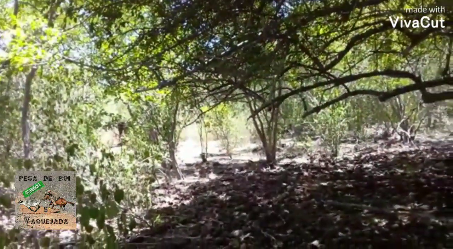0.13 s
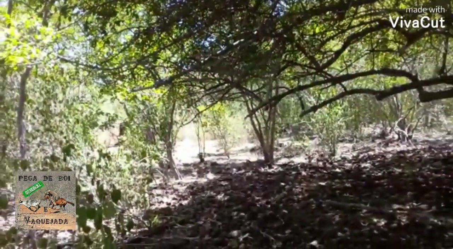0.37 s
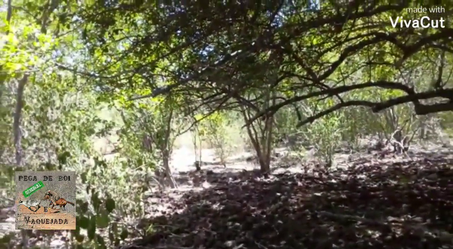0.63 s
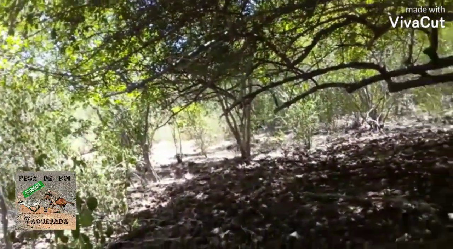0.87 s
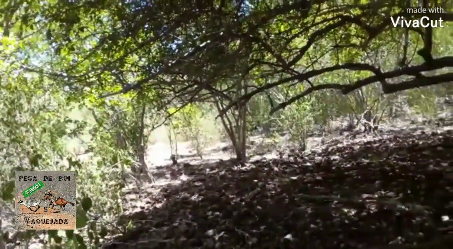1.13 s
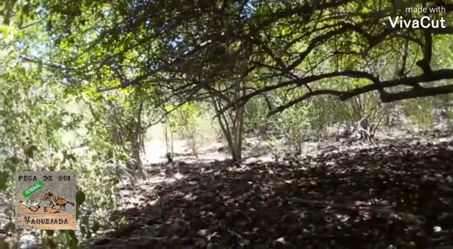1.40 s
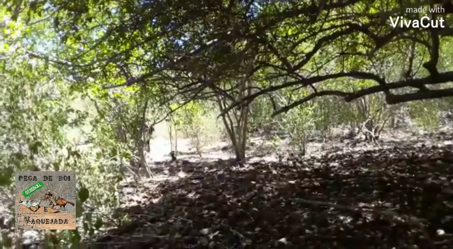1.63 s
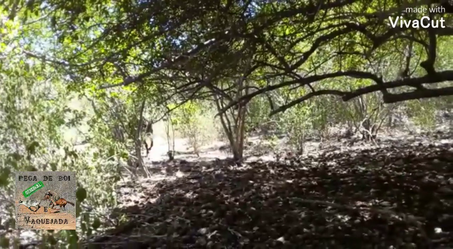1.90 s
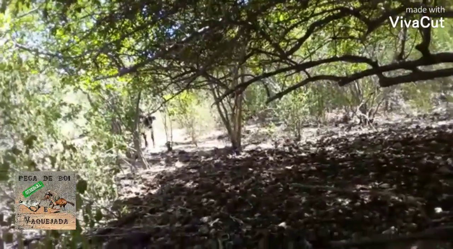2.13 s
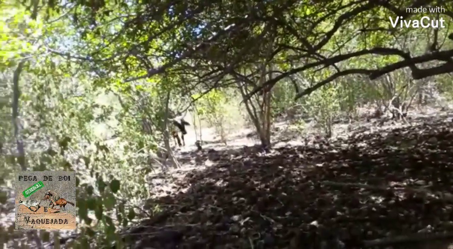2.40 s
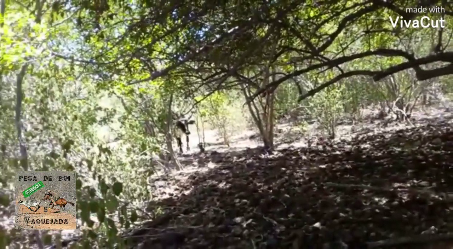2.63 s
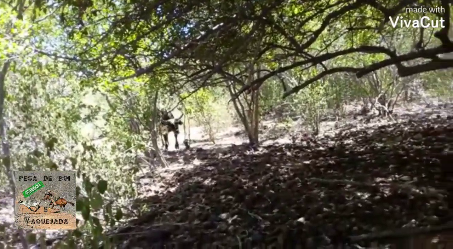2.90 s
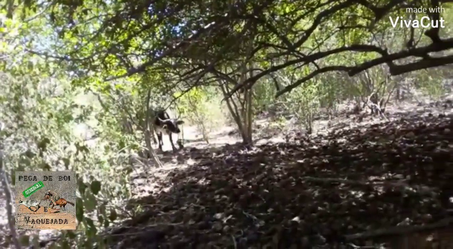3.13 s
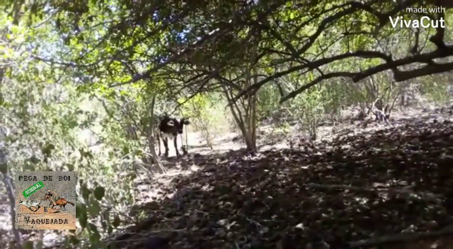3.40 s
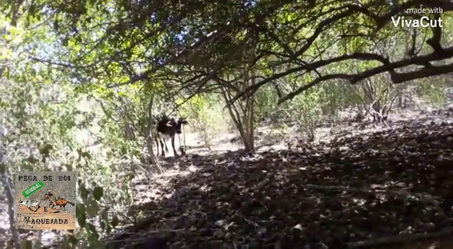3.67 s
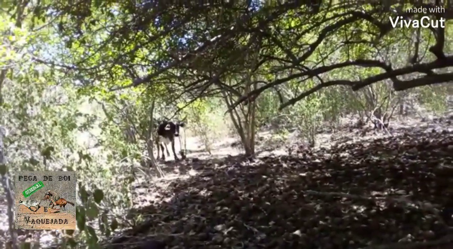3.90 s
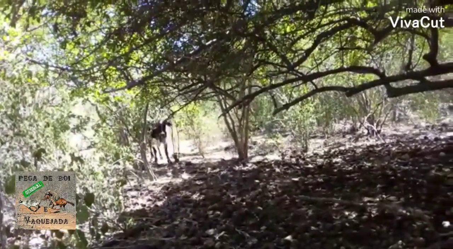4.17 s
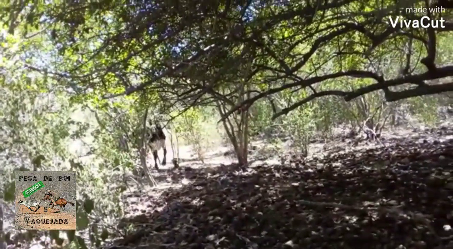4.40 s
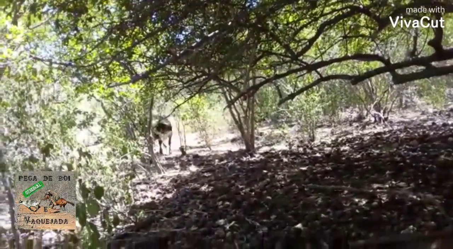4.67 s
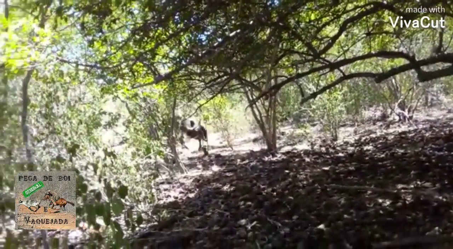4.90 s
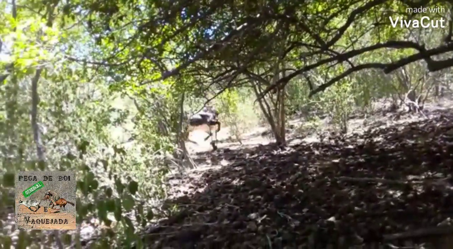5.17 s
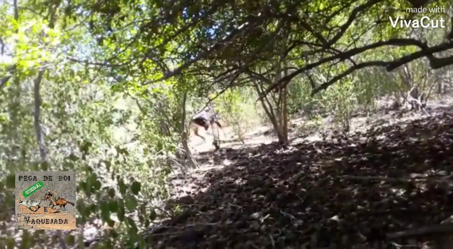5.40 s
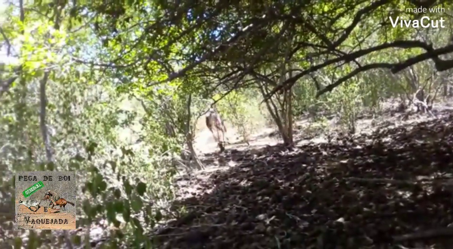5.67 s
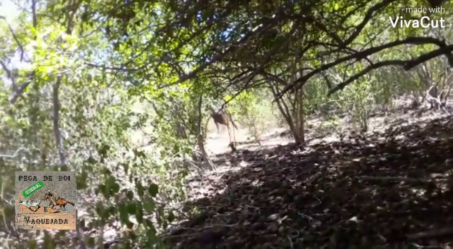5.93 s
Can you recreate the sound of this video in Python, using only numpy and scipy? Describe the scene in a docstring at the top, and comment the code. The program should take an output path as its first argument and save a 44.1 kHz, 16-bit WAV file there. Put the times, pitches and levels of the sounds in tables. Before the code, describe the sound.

Scattered brittle snaps over near silence, one faint bird whistle, then denser leaf crackle and soft hoof thuds peaking in a sudden crash through brush.

```python
"""Dry scrub, heard some way off through a phone: an animal moves, first sparsely, then in a dense rush.
Snapping twigs are brief cracks trailed by leaf bits; knocking sticks and thudding hooves are struck
resonances; leaf litter is dense tiny fractures, with scraping stems and ground rumble following it.
A small bird whistles once in gliding sines; distant air and wind rumble are steady filtered noise."""
import sys
import numpy as np
from scipy import signal
from scipy.fft import rfft, irfft
from scipy.io import wavfile
from scipy.ndimage import uniform_filter1d

SR = 44100
rng = np.random.default_rng(int(sys.argv[2]) if len(sys.argv) > 2 else 0)


def gain_from_db(level_db):
    """Convert decibel levels to linear amplitude factors (20 dB per decade)."""
    decades = np.asarray(level_db, float) / 20
    return 10 ** decades


def persist_wave(psi):
    """Save psi, clipped to +-1, as 16-bit WAV."""
    counts = np.round(np.clip(psi, -1, 1) * 32767).astype(np.int16)
    wavfile.write(sys.argv[1], SR, np.atleast_2d(counts).T)


N = 266496

# hooves and heavy branches: start_s, peak_db, pitch_hz, t60_s (sliding soil)
THUD_EVENTS = [(1.122, -57, 414, 0.1), (1.446, -54.5, 316, 0.22), (1.497, -50.5, 815, 0.13),
               (3.0, -54, 280, 0.12), (3.008, -48.5, 790, 0.18), (3.531, -50.5, 630, 0.15),
               (4.479, -49, 290, 0.33), (4.842, -45, 796, 0.57), (4.956, -33, 227, 0.091),
               (4.958, -37.5, 580, 0.033), (5.546, -44.5, 123, 0.1), (5.608, -49, 705, 0.12),
               (5.69, -42, 690, 0.26), (5.753, -43.5, 149, 0.12), (5.92, -42.5, 275, 0.072),
               (5.97, -42.5, 130, 0.39)]
# thicker sticks knocking and snapping: start_s, peak_db, pitch_hz, t60_s (slipping fibres)
KNOCK_EVENTS = [(0.1967,-52.5,1730,0.02),(0.772,-56,1560,0.042),(0.8134,-36.5,1820,.018),(0.8752,-52,1200,.022),(0.8915,-50,2090,0.028),(0.928,-50,2020,0.028),(0.943,-49.5,1690,.032),(.9747,-52,1630,0.073),(1.125,-53,1610,0.047),(1.274,-53,4410,.025),(1.4452,-39,1870,0.024),(1.5073,-37,1600,0.072),(1.5311,-43.5,1380,0.03),(1.7263,-50,2250,0.016),(1.8148,-43,2210,0.011),(2.0756,-38.5,1900,.027),(2.1234,-49,2290,0.022),(2.3273,-50.5,2350,.027),(2.416,-40,2310,0.011),(2.5286,-53,2540,.013),(2.556,-42.5,2600,0.01),(2.5732,-32.5,4080,0.01),(2.705,-53,2630,.019),(2.797,-48,2180,0.11),(3.0001,-46,1370,0.055),(3.016,-44.5,1500,0.036),(3.1182,-39.5,1670,0.013),(3.157,-43.5,2260,0.01),(3.3587,-51.5,2620,0.022),(3.532,-46,1700,0.1),(3.5603,-37,2620,0.021),(3.614,-40,3990,.025),(3.6457,-37.5,2200,0.011),(3.6983,-45,1720,.025),(3.7302,-42.5,2360,.033),(3.821,-46,2720,.022),(3.8712,-52,2390,.025),(3.8918,-41,2630,0.033),(3.922,-48.5,1690,.023),(3.9436,-34.5,2650,.009),(3.964,-37,2920,.02),(3.9701,-34.5,1810,0.026),(3.983,-48,2170,0.022),(4.0416,-33.5,3020,0.016),(4.0563,-37,2800,0.013),(4.135,-30.5,2900,0.018),(4.141,-56,2400,0.018),(4.4779,-41.5,1140,0.12),(4.592,-45,1080,0.13),(4.786,-48,3940,0.029),(4.8463,-34.5,3920,0.2),(4.959,-37,2130,0.053),(5.1904,-66,1920,.034),(5.2452,-47,1240,0.097),(5.2973,-47,2130,.039),(5.3792,-28,2080,0.028),(5.5333,-39,2260,0.044),(5.661,-25.5,4100,0.066),(5.6681,-38,2150,0.048),(5.6977,-25.5,1720,0.029),(5.884,-41.5,2100,0.034),(5.9294,-38.5,2150,0.036),(5.977,-40.5,2100,0.019)]
# spectrum of dry leaves: freq_hz, gain_db
LEAF_SPECTRUM = [(1500, -47), (2600, -10), (4500, -11.5), (5150, -3.5), (6000, -4.5), (6800, -3),
                 (8800, -6.5), (10200, -3), (11400, -8.5), (12600, -21), (16000, -61)]


def unit(x):
    """Scale to rms 1."""
    return x / np.sqrt(np.mean(x ** 2))


def peak(x, db):
    """Scale to a peak level."""
    return gain_from_db(db) * x / np.max(np.abs(x))


def decay(t, t60_s):
    """Exponential envelope, down 60 dB after t60_s."""
    return np.exp(-np.log(1000) * t / t60_s)


def colour(x, points):
    """Causal minimum-phase filter whose gain follows (Hz, dB) points."""
    hz, db = np.transpose(points)
    grid_hz = np.maximum(np.fft.rfftfreq(4096, 1 / SR), 1)
    gain = gain_from_db(np.interp(np.log(grid_hz), np.log(hz), db))
    cepstrum = irfft(np.log(gain))
    cepstrum[1:2048] *= 2  # fold onto positive time
    cepstrum[2049:] = 0
    impulse = irfft(np.exp(rfft(cepstrum)))
    return signal.fftconvolve(x, impulse)[:len(x)]


def ring(x, hz, width_hz):
    """Two-pole resonance, gain 1 at the centre."""
    b, a = signal.iirpeak(hz, max(hz / width_hz, 0.3), fs=SR)
    return signal.lfilter(b, a, x)


def walk(rate_hz):
    """Random levels held 1 / rate_hz, smoothed twice."""
    hold = int(SR / rate_hz)
    steps = np.repeat(rng.standard_normal(N // hold + 1), hold)
    return 0.14 * uniform_filter1d(uniform_filter1d(steps, hold), hold)[:N]


def grains(size, per_s, spread_db):
    """Tiny fractures at random moments, mostly small, a few large; rms 1."""
    hit = rng.random(size) < per_s / SR
    return unit(hit * rng.standard_normal(size) * gain_from_db(spread_db * rng.exponential(size=size)))


def add(out, start_s, sound):
    """Lay a sound into out at start_s."""
    i = int(start_s * SR)
    out[i:i + len(sound)] += sound[:N - i]


def along(column):
    """One column of the brush curve at every sample."""
    # body pushing through brush: start_s, leaf_db, stems_re_leaves_db, ground_rumble_db
    curve = np.array([(0.0, -77, -5.5, -70.5), (0.62, -74.5, -3, -68), (0.97, -68, -6, -67.5),
                      (1.13, -73, -3.5, -67.5), (1.36, -72, -2.5, -71), (1.65, -65.5, -3, -72.5),
                      (1.85, -69, -4.5, -70), (2.1, -76, -3.5, -69), (2.44, -72, -0.5, -67.5),
                      (2.86, -75, -0.5, -68), (3.13, -61.5, -5.5, -63.5), (3.48, -68.5, -7, -69.5),
                      (3.62, -59, -2.5, -63), (3.92, -63.5, -9.5, -71), (4.16, -71.5, -22, -68.5),
                      (4.44, -63, -5.5, -68.5), (4.63, -57, -10, -63.5), (4.83, -57.5, -1, -59),
                      (5.05, -58.5, -2, -56.5), (5.18, -51, -6.5, -57), (5.33, -41, -5.5, -53),
                      (5.43, -40.5, -5, -55), (5.77, -63, -4, -63), (6.04, -52, -12, -57.5)])
    return np.interp(np.arange(N) / SR, curve[:, 0], curve[:, column])


def scattered(per_s, above_leaves_db, low_hz, high_hz):
    """Small breaks at random moments, louder with the leaf rustle: rows start_s, peak_db, pitch_hz."""
    top_db, spread_db = -66, 3.5  # rustle above top_db brings no louder breaks
    when, size, pitch = rng.random((int(per_s * N / SR), 3)).T
    leaf_db = np.minimum(along(column=1)[(when * N).astype(int)], top_db)
    peak_db = leaf_db + above_leaves_db - spread_db * np.log(1 - size)
    pitch_hz = low_hz * (high_hz / low_hz) ** pitch
    return list(zip(when * N / SR, peak_db, pitch_hz))


def after(events, re_peak_db, t60_s):
    """Gain that jumps at each event to its peak plus re_peak_db and dies away."""
    kicks = np.zeros(N)
    for start_s, peak_db, *_ in events:
        kicks[int(start_s * SR)] += gain_from_db(peak_db + re_peak_db)
    return signal.lfilter([1], [1, -decay(1 / SR, t60_s)], kicks)


def distant_air():
    """Noise shaped to distant air and wind rumble, drifting slowly in level."""
    # freq_hz, gain_db (relative)
    spectrum = [(15, -55.5), (25, 5.5), (108, 8), (163, -12.5), (305, -4), (864, -15.5), (985, -16),
                (1750, -9), (2940, -38), (5640, -43), (10000, -29), (11400, -23), (12600, -44),
                (16400, -89), (22000, -120)]
    return unit(colour(rng.standard_normal(N), spectrum)) * gain_from_db(-71.5 + 0.58 * walk(2))


def ground_rumble():
    """Low noise from the ground that swells with the brush and rumbles on after each thud."""
    # freq_hz, gain_db (relative)
    spectrum = [(24, -56), (40, -3.5), (129, 3.5), (168, -2), (229, 0), (434, -8.5), (549, -7.5),
                (900, -15.5), (1170, -41.5), (1980, -120)]
    rumble = unit(colour(rng.standard_normal(N), spectrum))
    level = gain_from_db(along(column=3)) + after(THUD_EVENTS, re_peak_db=-8.5, t60_s=0.096)
    return rumble * level * gain_from_db(2.04 * walk(15))


def scraping_stems(flutter):
    """Dense fractures excite the stems' resonances and scrape on after each knock."""
    # centre_hz, width_hz, gain_db (relative)
    resonances = [(774, 550, 6.5), (1103, 270, 5), (1323, 254, 7.5), (2100, 335, 11.5), (2920, 250, 7.5),
                  (3710, 1000, 3)]
    scrape = grains(N, 5000, 2.3)
    stems = np.zeros(N)
    for hz, width_hz, db in resonances:
        stems += gain_from_db(db) * ring(ring(scrape, hz, width_hz), hz, 1.87 * width_hz)
    level = gain_from_db(along(column=1) + along(column=2)) + after(KNOCK_EVENTS, re_peak_db=-25.5, t60_s=0.16)
    return unit(stems) * level * gain_from_db(0.32 * flutter + 0.5 * walk(18))


def leaf_litter(flutter):
    """Leaves of several sizes crackle apart, each ringing in its own range, over a shared crackle."""
    sizes_hz = 3000 * 2 ** np.arange(0, 2.2, 0.34)
    apart = np.zeros(N)
    for hz in sizes_hz:
        apart += ring(grains(N, 2300, 3), hz, 0.4 * hz) * np.sqrt(hz) * gain_from_db(0.66 * walk(15))
    together = grains(N, 8000, 0.54)
    litter = unit(colour(unit(apart) + 3.3 * together, LEAF_SPECTRUM))
    return litter * gain_from_db(along(column=1) + 8.3 * flutter)


def brush():
    """Leaves and stems flutter together over the ground rumble."""
    flutter = walk(39)
    return leaf_litter(flutter) + scraping_stems(flutter) + ground_rumble()


def bird():
    """Thin whistled notes, pure sines gliding smoothly."""
    # one list per note: time_s, pitch_hz, level_db (rms)
    notes = [
        [(.267, 8340, -74), (.285, 8500, -67), (.315, 8330, -79), (.34, 7700, -66.5), (.395, 8230, -78),
         (.42, 7450, -71), (.46, 6860, -76), (.477, 6500, -72)],
        [(.395, 6000, -84), (.41, 6560, -79), (.428, 7400, -81)],
        [(.325, 6200, -82), (.338, 6800, -73), (.36, 6400, -83)],
        [(.232, 1600, -81), (.25, 2520, -64), (.258, 2400, -70), (.268, 1700, -77)],
    ]
    out = np.zeros(N)
    for note in notes:
        time_s, hz, db = np.transpose(note)
        t = np.arange(time_s[0], time_s[-1], 1 / SR)
        glide_hz = uniform_filter1d(np.interp(t, time_s, hz), size=400, mode="nearest")
        tone = np.sin(2 * np.pi * np.cumsum(glide_hz) / SR)
        level = np.sqrt(2) * gain_from_db(np.interp(t, time_s, db))
        add(out, time_s[0], level * tone * signal.windows.tukey(len(t), 0.08))
    return out


def hollow():
    """Brief sines wavering with narrow noise, quick to rise and slower to fade."""
    # start_s, level_db (sine peak before the envelope), pitch_hz, length_s
    tones = [(3.194, -61.5, 817, 0.089), (3.713, -65, 789, 0.1), (3.827, -62, 778, 0.049),
             (4.472, -54.5, 777, 0.094), (4.581, -59.5, 705, 0.12)]
    out = np.zeros(N)
    for start_s, db, hz, length_s in tones:
        t = np.arange(int(2 * length_s * SR)) / SR
        waver = 0.75 * unit(ring(rng.standard_normal(len(t)), hz, 200))
        shape = (1 - np.exp(-t / 0.015)) * np.exp(-(t / length_s) ** 3)
        add(out, start_s, gain_from_db(db) * shape * (np.sin(2 * np.pi * hz * t) + waver))
    return out


def thuds():
    """A blow and sliding soil ring the ground at one low pitch; a harder edge reaches higher."""
    out, t = np.zeros(N), np.arange(SR // 2) / SR
    for start_s, db, hz, t60_s in THUD_EVENTS:
        soil = rng.standard_normal(len(t)) * decay(t, t60_s)
        blow = 0.98 * np.exp(-((t - 0.004) * hz * 4) ** 2)
        edge = 0.23 * ring(soil * np.exp(-t / 0.0039), 3 * hz, 4 * hz)
        body = ring(ring(soil + blow, hz, 0.47 * hz), hz, 0.27 * hz)
        add(out, start_s, peak(body + edge, db))
    return out


def knocks():
    """An impulse and quick slips of breaking fibres ring the stick at its pitch."""
    out, t = np.zeros(N), np.arange(SR // 5) / SR
    small_t60_s = 0.0083
    breaks = scattered(per_s=2.5, above_leaves_db=4.5, low_hz=1300, high_hz=3300)
    small = [(*row, small_t60_s) for row in breaks]
    for start_s, db, hz, t60_s in KNOCK_EVENTS + small:
        slips = 0.1 * grains(len(t), 3700, 0.6) * decay(t, t60_s)
        slips[0] += 1
        add(out, start_s, peak(ring(ring(slips, hz, 0.31 * hz), hz, 3.8 * hz), db))
    return out


def snaps():
    """A millisecond crack with its own colour, then leaf bits and scattered echoes dying away."""
    # dry leaves and thin twigs: start_s, peak_db, centre_hz, shower_re_peak_db (before colour), shower_t60_s
    twig_breaks = [(.193,-54,5300,-8,0.19),(.416,-54,7750,-4,.12),(0.5734,-50.5,9990,3,.24),(0.6629,-36.5,7700,-10.5,0.24),(.8135,-11,7940,-21,0.097),(.876,-43,8000,-18,.12),(.8928,-46,7320,-11,0.1),(0.9286,-43,7180,-24,.12),(.943,-42.5,7400,-6.5,0.26),(1.0192,-34.5,6600,2,0.13),(1.1227,-43,8640,1,0.12),(1.276,-40.5,5330,-0.5,0.13),(1.4462,-35,5000,2.5,0.13),(1.4977,-45,9770,7,0.12),(1.5099,-35.5,10500,-2,.17),(1.605,-43.5,5300,1.5,0.12),(1.7132,-39.5,5640,-22,.1),(1.8151,-39,4770,-7.5,0.13),(1.918,-39.5,7440,-12,.16),(1.998,-47.5,7950,-17,.14),(2.065,-55,6000,4,0.22),(2.0754,-37,6850,-9,0.41),(2.14,-49.5,5290,-2,0.089),(2.2142,-52.5,5300,1.5,0.76),(2.2755,-46.5,8140,0,0.12),(2.327,-48,9900,-10,0.12),(2.3652,-44,9900,-22,.07),(2.416,-39.5,5430,-8.5,1),(2.526,-44,5400,-19,.08),(2.5735,-49.5,4460,3.5,0.43),(2.7043,-43.5,5700,-11,0.045),(2.777,-47.5,5640,-8,.1),(2.795,-51.5,5500,4,0.27),(2.805,-42,5400,2,0.36),(3,-46.5,6850,2,0.57),(3.101,-35,4870,-9,.1),(3.118,-27.5,5430,-15,0.061),(3.1418,-41.5,5350,-26,.12),(3.1768,-38,7540,-20,.16),(3.2392,-35.5,6800,-6.5,0.21),(3.442,-41,6870,-6,0.14),(3.462,-39.5,9300,-9,.09),(3.483,-31.5,6700,-9.5,0.17),(3.526,-36.5,7950,-3,.11),(3.5339,-39.5,9100,7,0.2),(3.5607,-25.5,7700,-13,.07),(3.608,-38,9000,4,0.19),(3.6458,-24,7850,-19,0.077),(3.6856,-38.5,5350,-20,.1),(3.698,-44,9540,-18,0.11),(3.7848,-44,5560,2.5,0.11),(3.8763,-44.5,8300,-25,.12),(3.8984,-41,8300,-20,.12),(3.9618,-42,10100,-11,.12),(3.9918,-40,7200,-10,0.14),(4.035,-30,7400,-29,0.11),(4.042,-21.5,8900,-15,0.24),(4.135,-45.5,4650,6,.17),(4.2617,-52,6600,5,0.087),(4.479,-48.5,5350,4.5,0.27),(4.625,-35.5,10400,-1.5,0.12),(4.6607,-32,10600,-18,0.12),(4.7224,-39,7100,1,0.056),(4.783,-34,6400,5,0.13),(4.8468,-37,5600,2,0.47),(4.9536,-39,6250,8,0.29),(5.1091,-36,10500,1.5,0.53),(5.3819,-10,6460,-4,0.15),(5.3923,-32,7000,2,0.26),(5.5308,-21,6200,3,0.088),(5.662,-29,4600,-1.5,0.1),(5.6994,-29.5,7800,4,0.27),(5.8835,-37,6650,-0.5,.08),(5.926,-39.5,5750,3,.1),(5.9724,-33.5,6700,5,.11)]
    cracks, showers, t = np.zeros(N), np.zeros(N), np.arange(SR // 2) / SR
    small_shower_db, small_t60_s = -8, 0.069
    breaks = scattered(per_s=9.8, above_leaves_db=10, low_hz=4000, high_hz=8800)
    small = [(*row, small_shower_db, small_t60_s) for row in breaks]
    for start_s, db, hz, shower_db, t60_s in twig_breaks + small:
        crack = 0.18 * rng.standard_normal(400) * np.exp(-t[:400] / 0.00096)
        crack[0] += 1
        crack = ring(ring(crack, hz, 0.35 * hz), hz, 1.5 * hz)
        add(cracks, start_s, peak(colour(crack, LEAF_SPECTRUM), db))
        shower = grains(len(t), 14000, 1.07) * decay(t, t60_s) * (1 - np.exp(-t / 0.0011))
        shower *= 1 + 0.71 * np.exp(-t / 0.0017)  # the first splinters are strongest
        # the bits lean toward the colour of their crack
        bits = 0.54 * shower + 0.26 * ring(shower, hz, 0.44 * hz)
        add(showers, start_s, gain_from_db(db + shower_db) * bits)
    return cracks + colour(showers, LEAF_SPECTRUM)


def treble_fizz(mono):
    """Faint treble noise that follows the sound: its band with random signs, refiltered."""
    scrambled = ring(mono, 4200, 6600) * np.sign(rng.standard_normal(N))
    return gain_from_db(-23) * ring(ring(scrambled, 8700, 5000), 8000, 5400)


def scene():
    """All sources reach one microphone; the channels differ only by the fizz, opposite in sign."""
    mono = distant_air() + brush() + bird() + hollow() + thuds() + knocks() + snaps()
    fizz = treble_fizz(mono)
    return np.array([mono + fizz, mono - fizz])


def top_cut(x):
    """Nothing passes above the cut-off."""
    return signal.sosfilt(signal.butter(12, 12800, fs=SR, output="sos"), x)


def record(dry):
    """The phone cuts the top steeply above 11180 Hz."""
    lowpass = signal.butter(10, 11180, fs=SR, output="sos")
    mix = signal.sosfilt(lowpass, dry)
    return top_cut(mix)


dry = scene()
out = record(dry)
persist_wave(out)
```